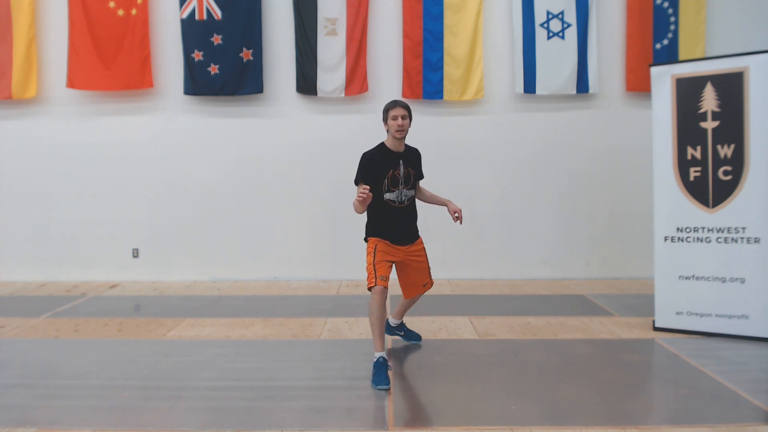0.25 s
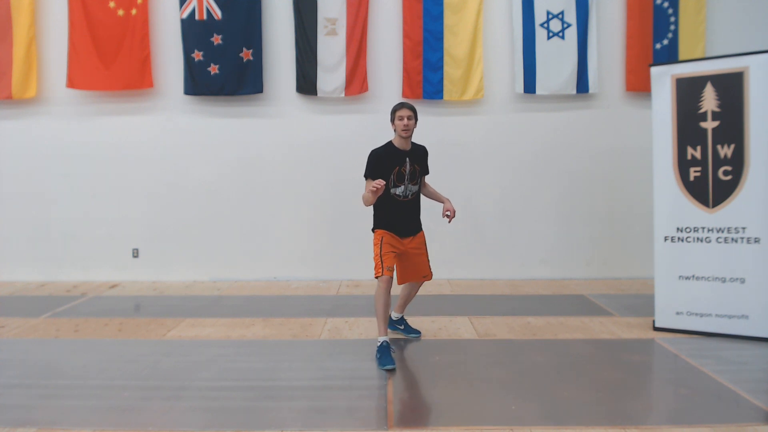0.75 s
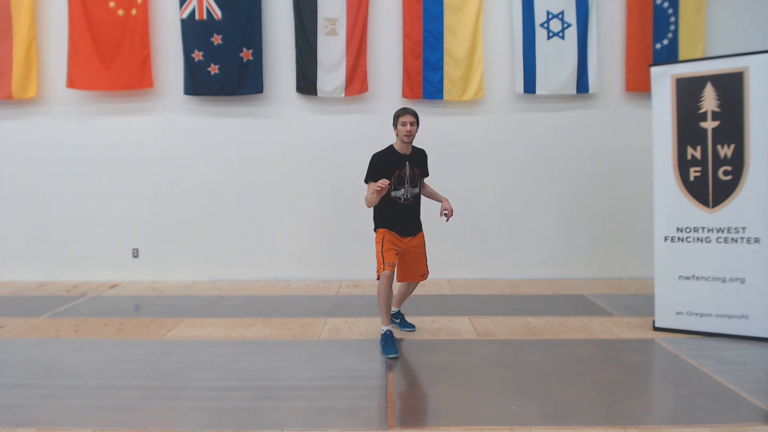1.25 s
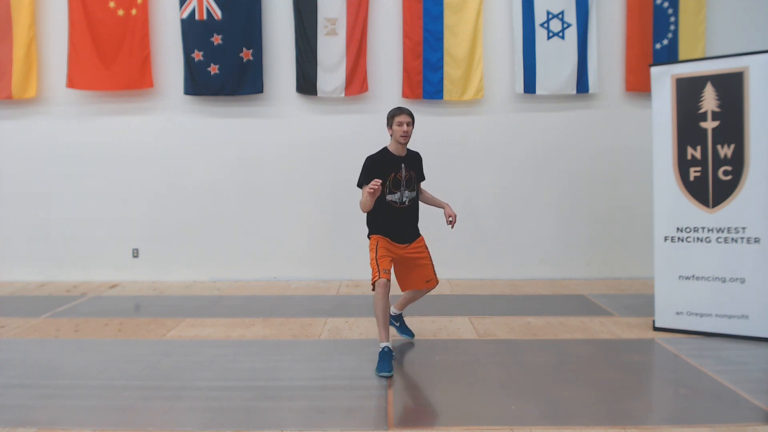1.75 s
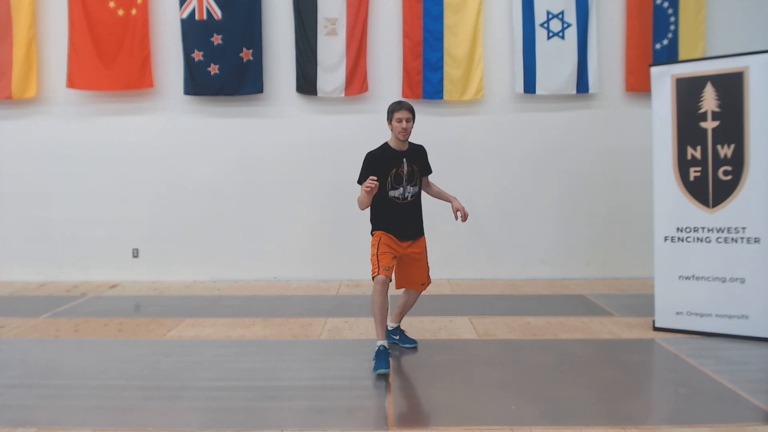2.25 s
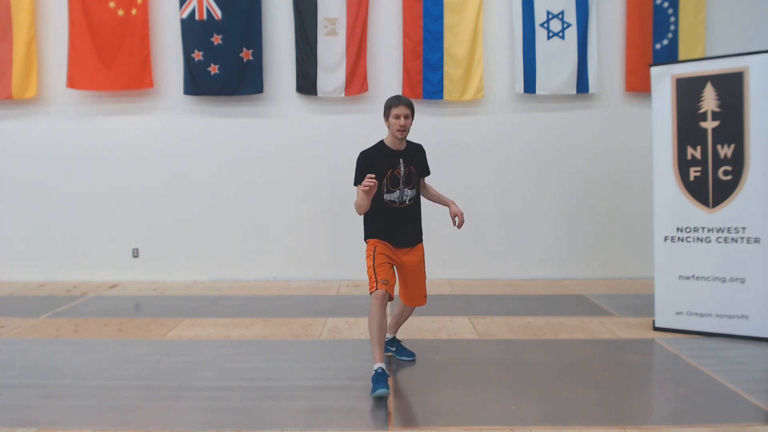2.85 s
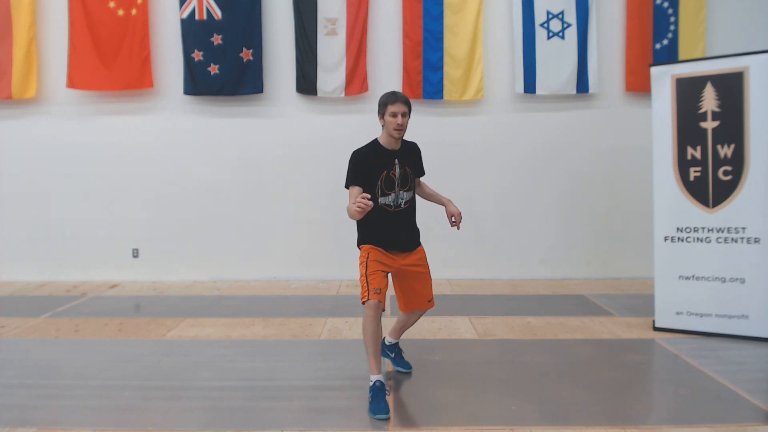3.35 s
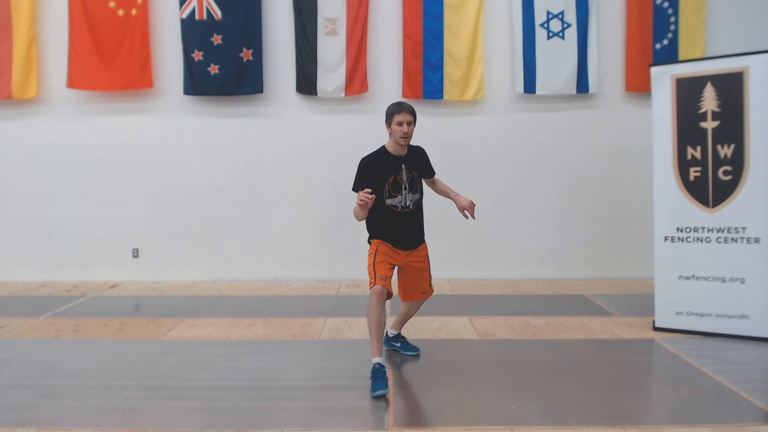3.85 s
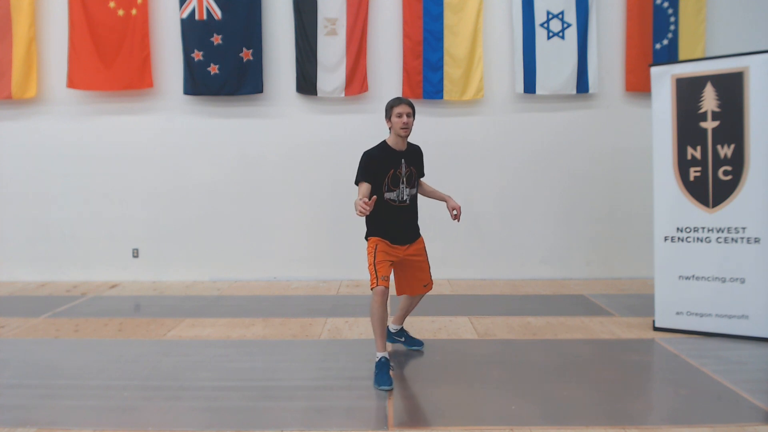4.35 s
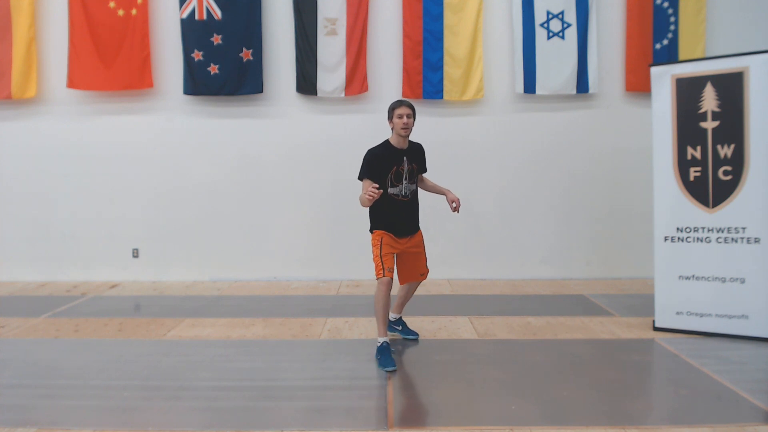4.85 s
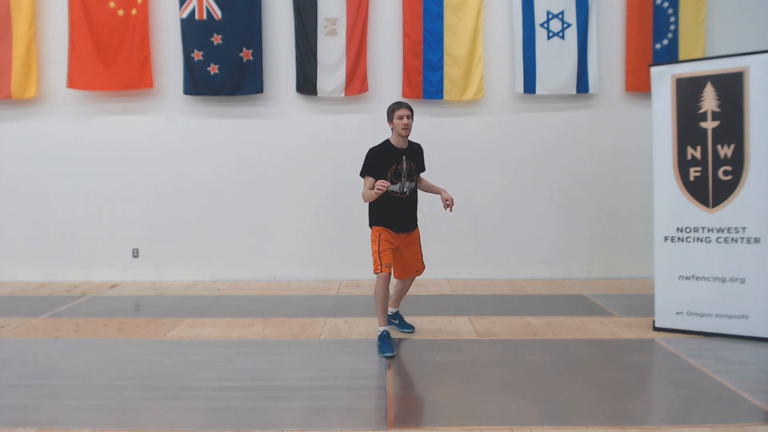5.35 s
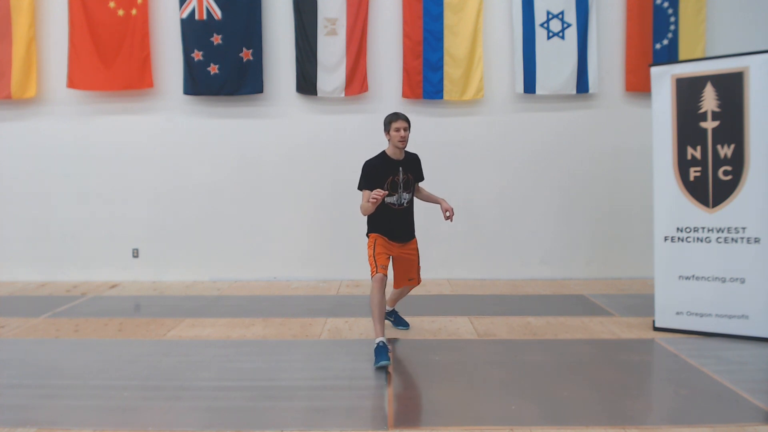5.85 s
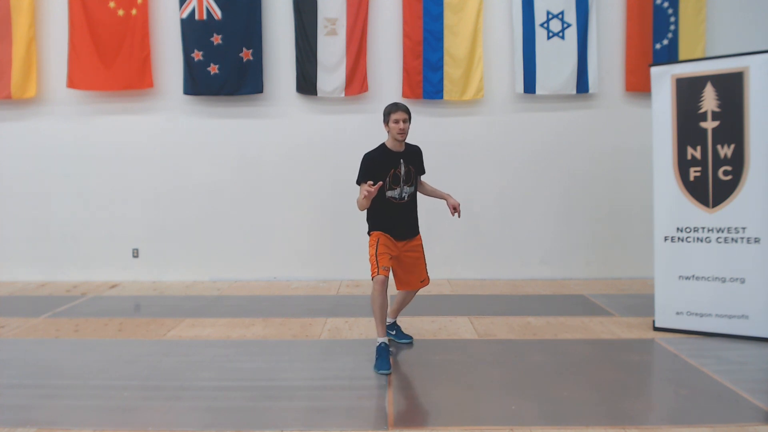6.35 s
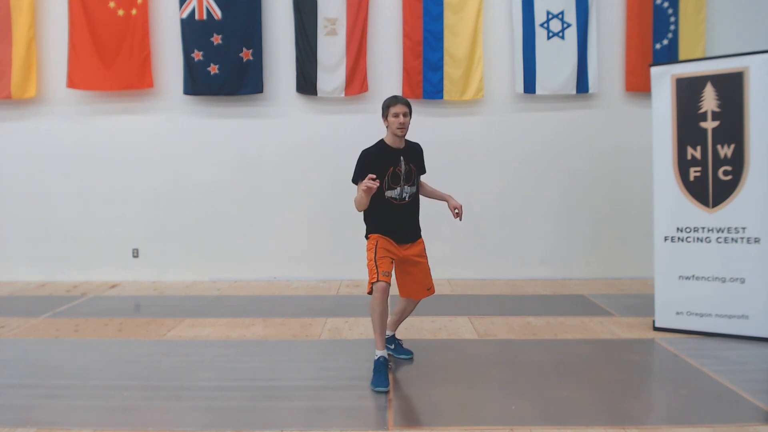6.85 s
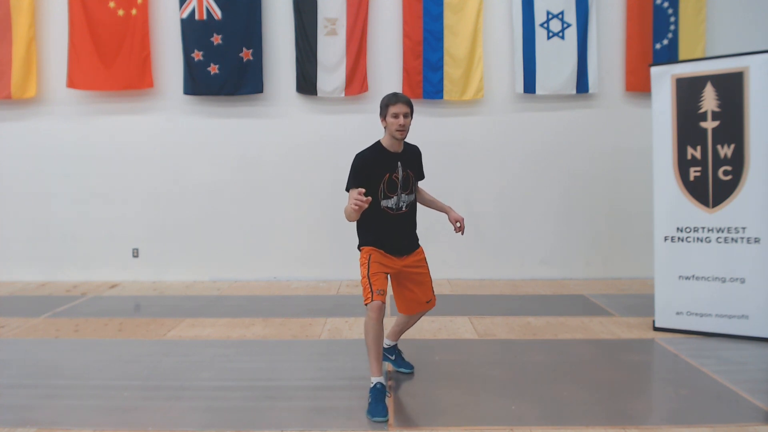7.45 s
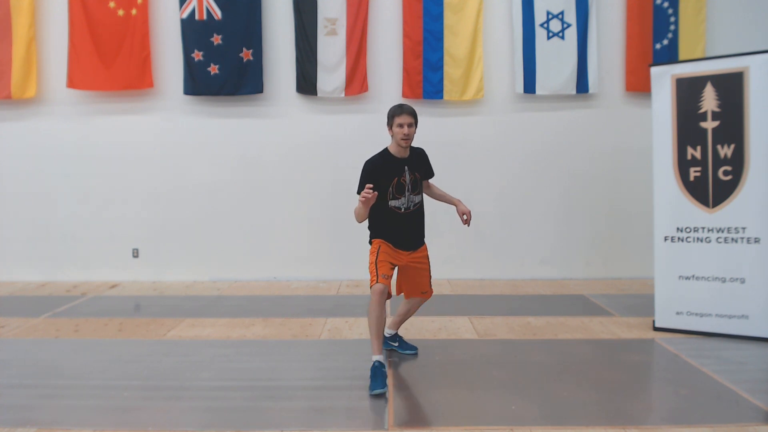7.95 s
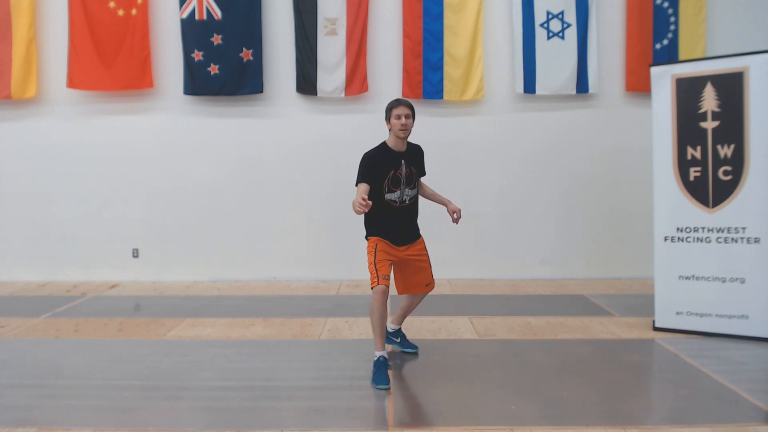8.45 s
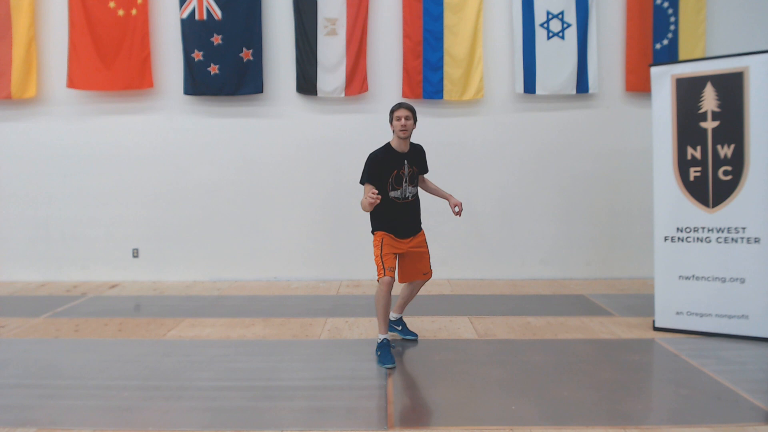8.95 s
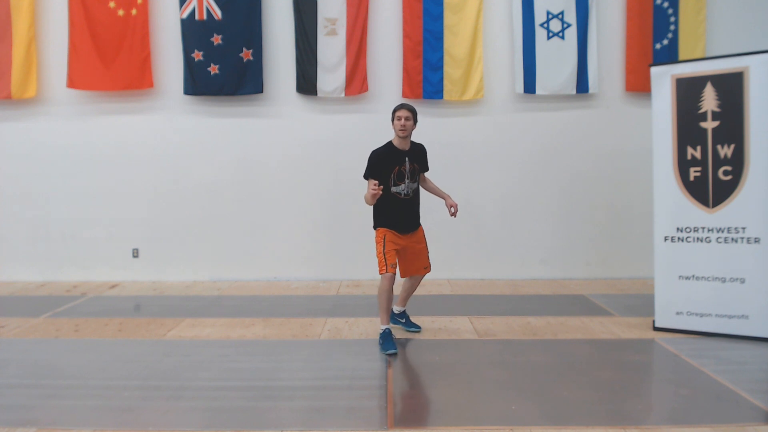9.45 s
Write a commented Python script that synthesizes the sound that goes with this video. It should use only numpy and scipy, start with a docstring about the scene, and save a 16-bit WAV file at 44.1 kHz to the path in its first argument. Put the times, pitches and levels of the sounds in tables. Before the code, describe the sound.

Rubber soles tap and skid on a hall floor, giving brief high squeaks that ring for about a second above a faint low hum.

```python
"""Sneakers on a sprung sports-hall floor

Quick footwork: soles thud, scuff and tick as blows and coloured noise; where rubber sticks and slips,
a wavering tone with overtones and rasp makes a short, shrill squeak.
An echo and a decaying noise tail let the hall hold it for about a second.
Behind it are ventilation noise and low hums, one like an engine outside that idles and then picks up speed."""
import sys
import numpy as np
from scipy import signal
from scipy.fft import rfft, irfft, next_fast_len
from scipy.io import wavfile

SR = 44100
rng = np.random.default_rng(int(sys.argv[2]) if len(sys.argv) > 2 else 0)


def persist_wave(psi):
    """Save psi, clipped to +-1, as 16-bit WAV."""
    counts = np.round(np.clip(psi, -1, 1) * 32767).astype(np.int16)
    wavfile.write(sys.argv[1], SR, np.atleast_2d(counts).T)


N = 427769

# Ventilation hiss and building rumble, as spectra: frequency_hz, level_db
AIR_COLOUR = [(280, 1), (450, -1.5), (750, -4), (1050, -2.5), (1370, -4), (1650, -16), (2100, -17.5),
              (2950, -15), (3400, -25), (4300, -18.5), (8000, -25.5), (10000, -33.5), (13000, -31.5),
              (16000, -38.5)]
RUMBLE_COLOUR = [(12, -12), (22, -0.5), (33, 0), (48, -2.5), (70, -10), (95, -13), (130, -16.5),
                 (175, -25.5), (250, -38), (500, -70.5)]
# Engine outside, before the wall weakens it: time_s, firing_rate_hz, level_db
ENGINE_COURSE = [(0.0, 33.28, -36), (1.7, 33.3, -33.5), (2.43, 60.9, -30.5), (4.0, 63.25, -32),
                 (4.48, 61.93, -29.5), (7.32, 73.55, -37.5), (8.08, 80.44, -43.5), (8.45, 88.85, -47.5),
                 (9.43, 83.4, -43.5), (9.7, 85.6, -42)]
# Decay time of the hall: frequency_hz, t60_s
HALL_T60 = [(150, 0.04), (400, 1.49), (1000, 1.99), (4000, 1.2475), (8000, 0.698), (13000, 0.35)]
# Spectra of the hall's tail and of the back wall's echo: frequency_hz, level_db
HALL_COLOUR = [(100, -4), (1000, 5), (4000, 1.5), (8000, -2.5), (14000, -9)]
WALL_COLOUR = [(200, -5.5), (4300, -3), (8000, -17.5), (14000, -18)]
# Clearest snaps of tread coming free, before a common trim: start_s, level_db
CLEAR_TICKS = [(0.124, -38.5), (0.7068, -41), (1.3096, -41), (2.383, -38), (3.6964, -42), (4.6547, -45),
               (6.3867, -46), (7.8682, -33), (8.4726, -47.5)]
# A foot dragged between landings: start_s, nominal_length_s, level_db, top_octave_db (before its shelf)
SCUFFS = [(0.404, 0.0243, -54, -7), (0.944, 0.053, -48, 6.5), (1.481, 0.0266, -59.5, 4),
          (3.388, .013, -49, -8), (3.779, 0.0104, -53.5, -4), (4.314, 0.021, -54.5, -18),
          (5.55, 0.0181, -49.5, -10), (5.723, 0.022, -58, -1), (6.065, 0.0266, -50, -0.5),
          (8.765, 0.02, -55, -7.5), (9.202, 0.052, -49.5, -9), (9.32, 0.061, -44, 5.5)]
# Feet landing; where there is no audible skid its level is very low:
# start_s, weight_db, contact_hardness_db, skid_db
STEPS = [(0.283, -28, -11, -49), (0.682, -29, -3.5, -53.5), (1.152, -31.5, -12, -53),
         (1.662, -40.5, -11, -78), (1.83, -35, -26, -47), (2.379, -44, 1, -67.5), (2.576, -33, -5.5, -68.5),
         (2.63, -32.5, -5.5, -43.5), (2.837, -37.5, 0, -50), (3.077, -32.5, -12, -44),
         (3.266, -47.5, 2, -46.5), (3.605, -38.5, -10.5, -68.5), (4.493, -30.5, -11, -60.5),
         (4.944, -32.5, -12.5, -52.5), (5.41, -37.5, -13.5, -51.5), (6.527, -48.5, 1.5, -58),
         (6.689, -40.5, -8.5, -72.5), (6.781, -34.5, -10.5, -44), (6.934, -37.5, 3, -42.5),
         (7.174, -33.5, -10, -43), (7.346, -44.5, 6.5, -40.5), (7.489, -42, 3, -56),
         (7.708, -32, -7.5, -74.5), (9.073, -33.5, -9.5, -65.5), (9.556, -29, -21, -54)]
# Rubber squeaks, before their overall colour: start_s, nominal_length_s, starting_pitch_hz, level_db,
# octave_db, roughness_0_to_1, toward_back_wall_db, lead_in_slide_db
SQUEAKS = [ (-0.30, 0.0185, 3949, -21.5, -23, 0.36, 12, -48),
           (0.548, 0.00668, 4715, -30.5, -1.5, 0.51, 12, -41.5),
           (3.273, 0.0134, 3929, -39.5, -15, .45, 4, -66),
           (3.939, 0.01682, 4212, -15, -5.5, 0.36, 8, -47.5),
           (4.772, 0.01385, 4291, -10.5, -4, .6, 6.5, -48.5),
           (5.238, 0.01596, 4416, -10.5, -6.5, .38, 2.5, -49.5),
           (7.343, .0204, 3769, -13, -3.5, .45, -3.5, -59.5),
           (8.037, .0151, 3936, -19.5, -4.5, .42, 11, -44),
           (8.91, 0.00953, 4172, -31, -11, 0.38, 14, -40.5)]
# Spectra of the floor's thump, its boards' knock and the slap of the air: frequency_hz, level_db
THUD_COLOUR = [(50, -10.5), (120, 5.5), (220, 0), (380, -4.5), (600, -10), (1200, -29), (4000, -61)]
KNOCK_COLOUR = [(200, -21), (450, 0.5), (700, 1), (1100, 1), (1400, -5.5), (1800, -22), (4000, -33),
                (9000, -54.5)]
SLAP_COLOUR = [(600, -15.5), (1300, -10), (1800, -1.5), (2800, 2), (3500, -8), (5500, -6), (9000, -16.5),
               (16000, -36)]
# Spectra of sliding tread and of the rasp in a squeak: frequency_hz, level_db
TREAD_COLOUR = [(800, -17), (2000, -13.5), (2900, -6.5), (3400, -14.5), (4200, -3), (6000, 1), (8600, 0.5),
                (10700, -12.5), (12800, -7.5), (15000, -14.5), (17000, -26.5)]
RASP_COLOUR = [(1200, -44), (2000, -24), (2950, -10.5), (3350, -20), (4200, -4.5), (5400, 3), (6700, -8.5),
               (8400, 0), (10500, -19.5), (12500, -16), (16000, -36.5)]
# Overall colour of the squeaks, with a dip near 3.4 kHz: frequency_hz, level_db
SQUEAK_COLOUR = [(1200, -15.5), (2300, -9), (2950, 2), (3350, -14), (3750, -0.5), (9000, -2), (10500, -6),
                 (12500, -1.5), (16000, -7.5)]

TOP_HZ = 16000
LEAD = SR // 2  # samples played before time zero: the footwork is already under way
AIR_DB = -54
# A second hum of nearly steady pitch swells and fades once
DRONE_HZ, DRONE_DB, DRONE_PEAK_S, DRONE_WIDTH_S = 86.64, -43.5, 5.895, 1.1
# Fainter snaps come at random, before the same trim as the clear ones
FAINT_TICKS_PER_S, FAINT_TICK_DB, FAINT_TICK_SPREAD_DB = 2.2, -55, 3
# The slide that leads into a squeak: its top octave brightens as it gets louder
SLIDE_S, SLIDE_TOP_DB, SLIDE_TOP_DB_PER_DB = .038, -4.5, 0.93
# Many landings skid briefly, the others inaudibly: the louder the skid, the duller it is
SKID_LAG_S, SKID_S, SKID_TOP_DB, SKID_TOP_DB_PER_DB = 0.0034, 0.021, -2.5, -0.8
SCUFF_REF_DB = -51  # level at which slides and skids have their stated top octave
# As the sole grips, every squeak drifts part of the way to the tread's own pitch
TREAD_HZ, DRIFT_SHARE = 3788.3, .45


def undb(db):
    """Decibels are logarithmic: convert them to an amplitude gain."""
    return 10 ** (np.asarray(db) / 20)


def unit(x):
    """Normalization: scale to rms 1."""
    return x / np.sqrt(np.mean(x ** 2))


def read(points, hz):
    """Logarithmic frequency scale: join a table's values by straight lines over it."""
    f, value = np.transpose(points)
    return np.interp(np.log(np.maximum(hz, 1)), np.log(f), value)


def colour(x, points, top_db=0):
    """Spectral filtering: weight each frequency, with a shelf for the top octave."""
    size = next_fast_len(len(x))
    hz = np.fft.rfftfreq(size, 1 / SR)
    shelf = 1 / (1 + np.exp((8500 - hz) / 1100))
    gain = undb(read(points, hz) + top_db * shelf)
    return irfft(rfft(x, size) * gain, size)[:len(x)]


def noise(size, points, top_db=0):
    """Filtered random noise: coloured, with rms 1."""
    return unit(colour(rng.standard_normal(size), points, top_db))


def response(points, size=2048):
    """Minimum phase: folding the cepstrum gives a colour a causal impulse response of energy 1."""
    cepstrum = irfft(np.log(undb(read(points, np.fft.rfftfreq(size, 1 / SR)))))
    cepstrum[1:size // 2] *= 2
    cepstrum[size // 2 + 1:] = 0
    h = irfft(np.exp(rfft(cepstrum)))
    return h / np.linalg.norm(h)


def ring(x, h):
    """Convolution: pass a sound through an impulse response."""
    return signal.fftconvolve(x, h)[:len(x)]


def delay(x, s):
    """Propagation delay: the same sound, later."""
    return np.pad(x, (int(s * SR), 0))[:len(x)]


def wander(size, rate):
    """Random modulation: normal values, rate a second, joined by straight lines."""
    place = np.arange(size) * rate / SR
    return np.interp(place, np.arange(size), rng.standard_normal(size))


def add(track, s, sound):
    """Superposition: mix a sound into a track at a time."""
    i = LEAD + int(s * SR)
    track[i:i + len(sound)] += sound[:len(track) - i]


def gate(t, length, rise, fall):
    """Contact envelope: build up, hold, and decay exponentially after the length."""
    build_up = 1 - np.exp(-(t / rise) ** 2)
    return build_up * np.exp(-np.maximum(t - length, 0) / fall)


def air(swell_db=0.28):
    """Broadband flow noise: a ventilation hiss whose level wavers slightly."""
    return noise(N, AIR_COLOUR) * undb(AIR_DB + swell_db * wander(N, 2.3))


def rumble(rumble_db=-34.0):
    """Low-frequency noise: the slowly wavering rumble of the building."""
    return noise(N, RUMBLE_COLOUR) * undb(rumble_db + 1.0 * wander(N, 0.67))


def hum(hz, octave_db, waver_db, unsteady=.04):
    """Harmonic oscillation: a low, slightly unsteady tone with a weak octave."""
    phase = 2 * np.pi * np.cumsum(hz * (1 + unsteady * wander(N, 12))) / SR
    level = np.sqrt(2) * undb(waver_db * wander(N, 8.5))
    return level * (np.sin(phase) + undb(octave_db) * np.sin(2 * phase))


def drone():
    """Amplitude modulation: a bell-shaped swell makes a faint hum come and go."""
    swell = np.exp(-.5 * ((np.arange(N) / SR - DRONE_PEAK_S) / DRONE_WIDTH_S) ** 2)
    return undb(DRONE_DB) * swell * hum(DRONE_HZ, octave_db=-26.5, waver_db=2.5, unsteady=.025)


def engine(through_wall_db=-2):
    """Transmission through walls: of the engine outside, only the firing rate and a weak octave remain."""
    s, *columns = np.transpose(ENGINE_COURSE)
    hz, db = (np.interp(np.arange(N) / SR, s, c) for c in columns)
    return undb(db + through_wall_db) * hum(hz, octave_db=-37.0, waver_db=1.5)


def background():
    """Superposition of ventilation, building rumble and the hums that come through the walls."""
    return air() + rumble() + engine() + drone()


def reverb(x, size=65536, tail_db=-11, early_db=-10.0, early_s=0.024, gap_s=0.0069):
    """Diffuse reverberation: scattered reflections and a noise tail whose bands decay at their own rates."""
    t, hz = np.arange(size) / SR, np.fft.rfftfreq(size, 1 / SR)
    centres = np.geomspace(125, 16000, num=15)
    diffuse, tail = rfft(rng.standard_normal(size)), 0
    for centre, share in zip(centres, np.eye(len(centres))):
        band = irfft(diffuse * read(np.c_[centres, share], hz))
        decay = np.exp(-np.log(1000) * t / read(HALL_T60, centre))  # 60 dB down after t60
        tail = tail + band * undb(read(HALL_COLOUR, centre)) * decay
    tail *= (1 - np.exp(-t / gap_s)) * np.sqrt(12 / SR)
    early = rng.standard_normal(size) ** 3 * gate(t, 0.036, 0.0089, early_s)  # cubing makes it sparse
    early /= np.linalg.norm(early)
    return ring(x, undb(tail_db) * tail + undb(early_db) * early)


def hall(draws, wall_s=0.015, far_s=.037, far_db=-11):
    """Reflection: direct sound, a back-wall echo, a later one, and reverberation averaged over the draws."""
    walls = [delay(colour(behind, WALL_COLOUR), wall_s) for _, behind in draws]
    near = [front + wall for (front, _), wall in zip(draws, walls)]
    far = undb(far_db) * delay(walls[0], far_s)  # far_s counts from the first echo
    return near[0] + far + sum(map(reverb, near)) / np.sqrt(len(near))


def ticks(size=1024, tick_db=-4.5, fade_s=0.0044, count=64):
    """Sudden release: tiny decaying snaps as tread peels off the floor, a few clear among fainter ones."""
    out, t = np.zeros(LEAD + N), np.arange(size) / SR
    times = np.cumsum(rng.exponential(size=count)) / FAINT_TICKS_PER_S
    levels = FAINT_TICK_DB + FAINT_TICK_SPREAD_DB * rng.standard_normal(count)
    for s, db in CLEAR_TICKS + list(zip(times, levels)):
        snap = undb(db + tick_db) * np.exp(-t / fade_s) * noise(size, TREAD_COLOUR, top_db=-4.5)
        if s < N / SR:
            add(out, s, snap)
    return out


def scuffs(size=8192, grain_db=5.0, chatter_db=2):
    """Sliding friction: grainy hiss before each squeak, after many landings and when a foot drags."""
    out, t = np.zeros(LEAD + N), np.arange(size) / SR
    slides = [(s - SLIDE_S, SLIDE_S, db, SLIDE_TOP_DB + SLIDE_TOP_DB_PER_DB * (db - SCUFF_REF_DB))
              for s, *_, db in SQUEAKS]
    skids = [(s + SKID_LAG_S, SKID_S, db, SKID_TOP_DB + SKID_TOP_DB_PER_DB * (db - SCUFF_REF_DB))
             for s, *_, db in STEPS]
    for s, length, db, top_db in slides + skids + SCUFFS:
        grain = unit(undb(grain_db * wander(size, 2200) + chatter_db * wander(size, 180)))
        contact = undb(db) * gate(t, 1.096 * length, 0.085 * length, 0.01)
        add(out, s, contact * grain * noise(size, TREAD_COLOUR, top_db))
    return out


def steps(size=4096, thud_db=20, knock_db=18.0, slap_db=13.5, strike=0.99):
    """Impact excitation: a blow and brief settling thump the floor; a hard one knocks boards and slaps air."""
    out, t = 0, np.arange(size) / SR
    # colour, level dB, settling time s, whether hardness counts
    parts = [(THUD_COLOUR, thud_db, .014, False),
             (KNOCK_COLOUR, knock_db, .022, True),
             (SLAP_COLOUR, slap_db, .006, True)]
    for points, part_db, settle_s, needs_hardness in parts:
        blows = np.zeros(LEAD + N)
        for s, weight_db, hard_db, _ in STEPS:
            settling = rng.standard_normal(size) * gate(t, 0.0013, 0.00081, settle_s)
            blow = unit(settling) / np.sqrt(size)  # energy 1
            blow[0] += strike
            add(blows, s + .003, undb(weight_db + part_db + needs_hardness * hard_db) * blow)
        out = out + ring(blows, response(points))
    return out


def squeaks(size=4096, waver=0.02, jitter=.075, flutter_db=3.0, third_db=-17.0, rasp_db=-4, rounding_db=8):
    """Stick-slip oscillation: a short, unsteady tone, sharp-edged at first, also beamed to the back wall."""
    front, behind, t = np.zeros(LEAD + N), np.zeros(LEAD + N), np.arange(size) / SR
    for s, length, first_hz, db, octave_db, rough, wall_db, _ in SQUEAKS:
        progress = np.minimum(t / length, 1)
        drift_hz = first_hz + DRIFT_SHARE * (TREAD_HZ - first_hz) * progress
        hz = drift_hz * (1 + waver * wander(size, 700) + jitter * rough * wander(size, 2500))
        phase = 2 * np.pi * np.cumsum(hz) / SR
        edge = undb(rounding_db * (.5 - progress))  # the tone rounds off as the sole settles
        onset = 1 - 0.27 * np.exp(-t / 0.0016)
        tone = np.sin(phase) * undb(flutter_db * wander(size, 400)) * onset
        harmonics = np.sin(2 * phase) + undb(third_db) * np.sin(3 * phase)
        overtones = edge * harmonics * undb(octave_db + 4.0 * wander(size, 900))
        rasp = rough * undb(rasp_db) * noise(size, RASP_COLOUR)  # ribs that slip out of step
        contact = undb(db) * gate(t, 0.895 * length, 0.004, 0.0034)
        add(front, s, contact * (np.sqrt(2) * (tone + overtones) + rasp))
        to_wall = np.sqrt(2) * (undb(wall_db) * tone + overtones) + undb(wall_db / 2) * rasp
        add(behind, s, contact * to_wall)
    return colour(front, SQUEAK_COLOUR), colour(behind, SQUEAK_COLOUR)


def scene(wall_db=-4, count=3):
    """Averaging: several random draws of each squeak give the hall, over its background, a smoother tail."""
    feet = steps() + scuffs() + ticks()
    squeak_draws = [squeaks() for _ in range(count)]
    draws = [(front + feet, behind + undb(wall_db) * feet) for front, behind in squeak_draws]
    return (hall(draws)[LEAD:] + background())[None]


def record(dry):
    """Band limitation: a steep elliptic low-pass cuts the top."""
    low_pass = signal.ellip(8, .2, 70, TOP_HZ, fs=SR, output="sos")
    return signal.sosfilt(low_pass, dry)


dry = scene()
out = record(dry)
persist_wave(out)
```